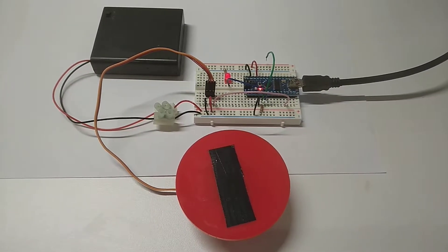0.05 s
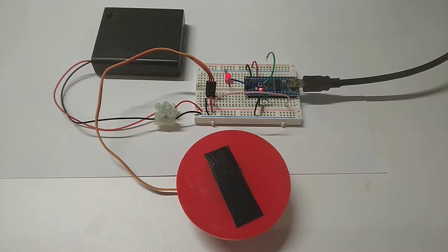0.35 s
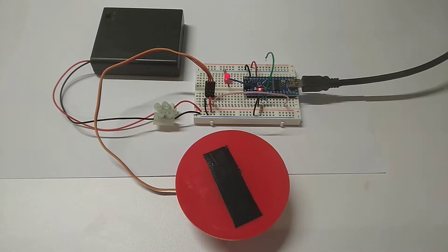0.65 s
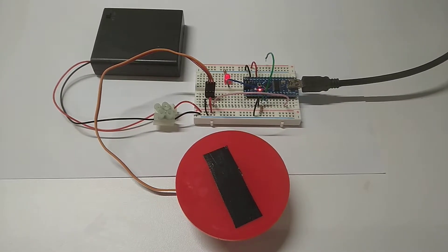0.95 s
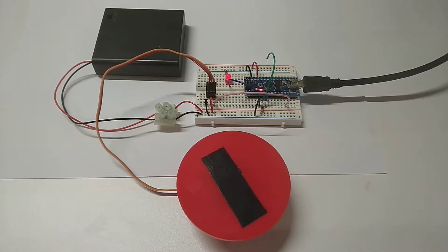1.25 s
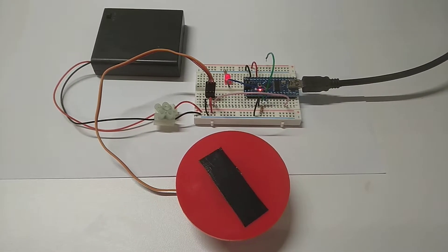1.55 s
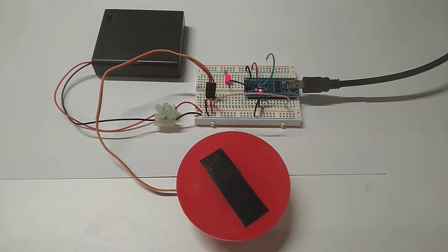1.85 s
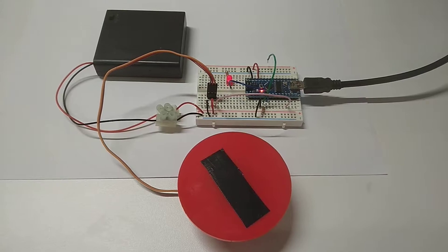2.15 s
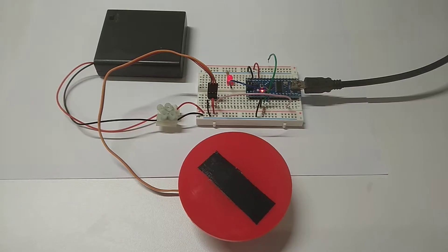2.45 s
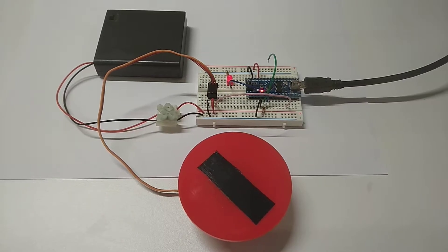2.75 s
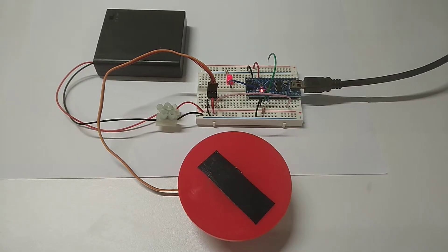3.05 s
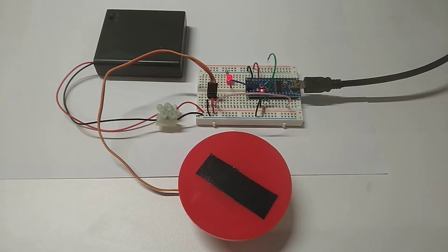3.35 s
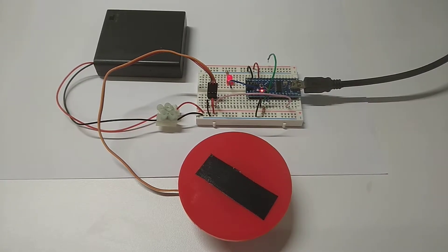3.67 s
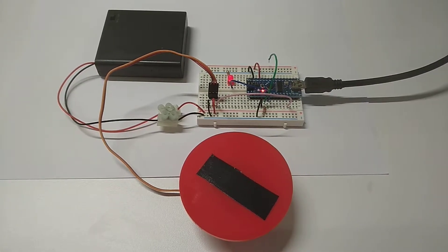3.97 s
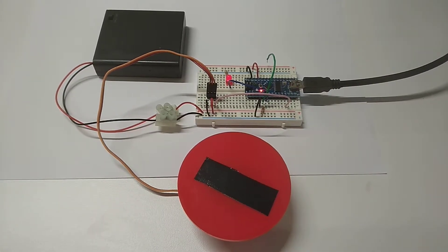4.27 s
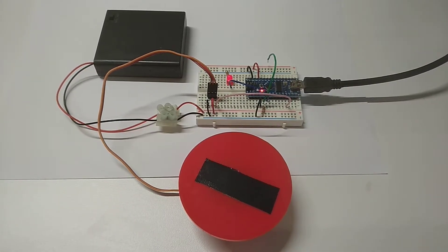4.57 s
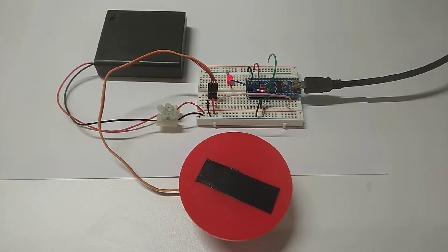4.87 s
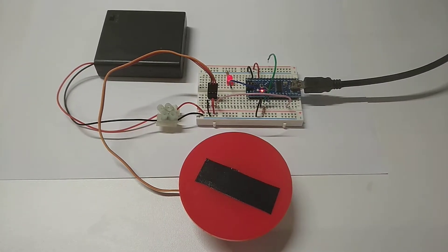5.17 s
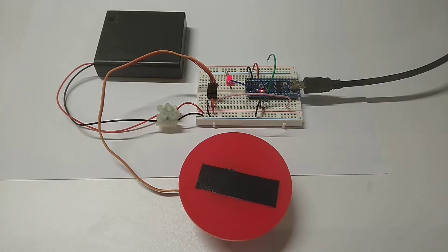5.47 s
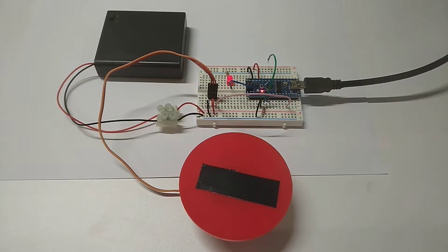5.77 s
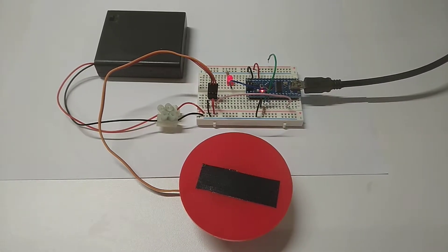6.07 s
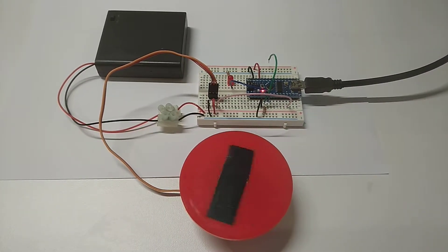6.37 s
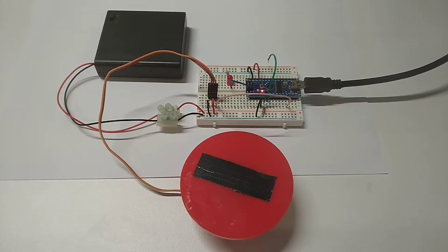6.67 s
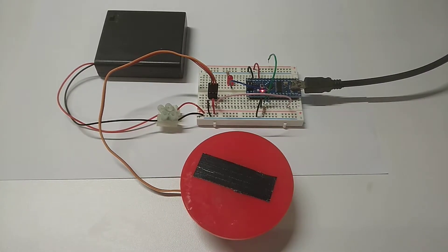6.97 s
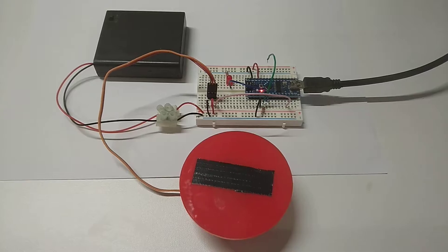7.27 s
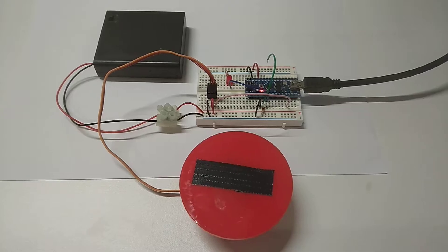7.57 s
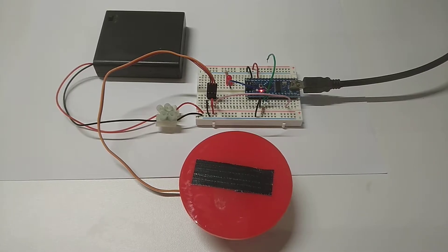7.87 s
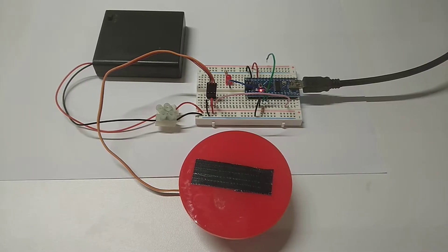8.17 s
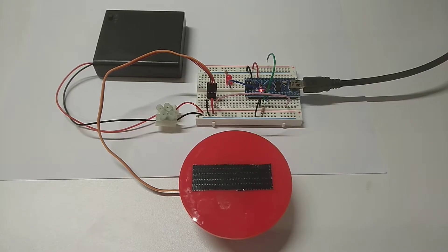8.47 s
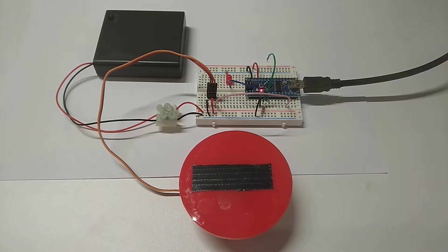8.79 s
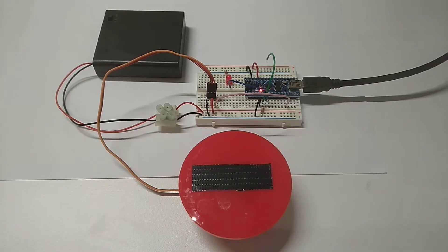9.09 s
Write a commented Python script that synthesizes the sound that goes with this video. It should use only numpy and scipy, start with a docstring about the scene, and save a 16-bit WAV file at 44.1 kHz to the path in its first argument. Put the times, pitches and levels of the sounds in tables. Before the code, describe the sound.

A small hobby servo nudges a plastic disc on a workbench, one short step every second. Each step is a brief, bright rasp of gears in a thin case, some with tiny ticks. The seventh move is a longer sweep with a high motor whine, and three more short steps follow. The sound is close and in stereo, over faint room rumble and microphone hiss.

```python
"""A small hobby servo turns a plastic disc on a workbench, close and in stereo, in a quiet room.
From 0.3 s it takes one short step a second: the motor kicks off, brakes, then rocks or creeps into place.
Its gear teeth rattle in the thin case, the disc hums along and the slack in the gears ticks.
At 6.25 s the seventh move is one long sweep: a third of a second of rasp and rotor whine.
Three more short steps follow. Room rumble and microphone hiss lie under it all."""
import sys
import numpy as np
from scipy import signal
from scipy.fft import rfft, irfft, next_fast_len
from scipy.io import wavfile
from scipy.ndimage import uniform_filter1d

SR = 44100
rng = np.random.default_rng(int(sys.argv[2]) if len(sys.argv) > 2 else 0)


def wrap_up_sound(samples):
    """Save the sound to the file named by the first command line argument, as 16-bit audio."""
    columns = np.atleast_2d(samples).T
    # keep every value between -1 and 1, then stretch to whole-number steps
    tamed = np.clip(columns, -1, 1)
    steps = np.round(tamed * 32767).astype(np.int16)
    wavfile.write(sys.argv[1], SR, steps)


N = 411453
TIME = np.arange(N) / SR
HZ = np.fft.rfftfreq(N, 1 / SR)


def step_rattle(top_mesh_hz=1350, top_db=-22, low_hz=3800, high_hz=11000, high_db=-2, slow_dull_db=13.5):
    """Gear force of the steps: the faster the motor, the denser, louder and brighter the knocks."""
    level, bright_db = motor_effort()
    speed = np.clip(np.sqrt(level / amp(top_db)), 0.1, 1)
    force = level * gear_teeth(top_mesh_hz * speed, spread_db=0.5, knock_db=-5.5,
                               rebound_db=-1.5, rub_s=0.0016)
    low = tint(force, 1 / (1 + (HZ / low_hz) ** 6))
    high = tint(force, 1 - 1 / (1 + (HZ / high_hz) ** 10))
    low_gain = amp(-0.33 * bright_db)
    high_gain = amp(high_db + bright_db - slow_dull_db * (0.5 - speed))
    return force + low * (low_gain - 1) + high * (high_gain - 1)


# Each row: top of the kick in seconds, kick level in dB, kick length factor, travel to the brake in
# seconds, brake level in dB, brake length factor, loss per rebound in dB, brightness in dB,
# disc hum at the kick in dB, disc hum at the brake in dB. Levels are relative.
STEPS = [(0.28, -25, 0.91, .057, -24, 1.1, 12.5, 1.5, -64, -52),
         (1.285, -22.5, 1.03, 0.053, -25, 1.3, 20, 3, -52.5, -53),
         (2.283, -24.5, 1.16, 0.038, -40, 1.3, 19, 2.5, -62, -53),
         (3.257, -23.5, 1.19, 0.053, -37, 0.83, 31.5, 0, -55, -60),
         (4.281, -26.5, 1.3, .044, -28.5, 1, 29.5, 4.5, -69, -56.5),
         (5.253, -25.5, .85, 0.046, -22, 1.01, 32, 0.5, -57, -55.5),
         (6.246, -20.5, 0.81, .328, -24, 0.99, 29.5, 1, -68.5, -55.5),
         (7.256, -22.5, .95, 0.042, -24.5, 0.85, 16.5, -1, -64, -52.5),
         (8.247, -26.5, 0.73, .037, -21.5, 0.72, 8, -3, -62.5, -61),
         (9.244, -24.5, 0.99, 0.04, -24.5, 1.18, 13, -4, -69, -56)]


def surges(rebound_s=0.041, rebound_length=1.2, dull_db_per_s=44, dull_share=0.28, hum_share=0.39):
    """Kick, brake, two rebounds per step. Yields top in s, dB, length factor, brightness dB, hum dB."""
    for (kick_s, kick_db, kick_length, travel_s, brake_db, brake_length,
         loss_db, bright_db, kick_hum_db, brake_hum_db) in STEPS:
        brake_s = kick_s + travel_s
        yield kick_s, kick_db, kick_length, bright_db, kick_hum_db
        # longer travel, duller brake
        yield brake_s, brake_db, brake_length, bright_db - dull_db_per_s * travel_s, brake_hum_db
        for k in (1, 2):
            lost_db = k * loss_db
            yield (brake_s + k * rebound_s, brake_db - lost_db, rebound_length,
                   bright_db - dull_share * lost_db, brake_hum_db - hum_share * lost_db)


# Each row: first nudge in seconds, length in seconds, nudge interval in seconds, relative level in dB.
CREEPS = [(2.344, .066, .028, -41.5), (2.447, .012, .028, -56.5), (3.300, .034, .016, -40),
          (3.387, .045, .034, -41), (4.244, .012, .028, -51), (8.409, 0.093, 0.034, -65)]


def creep_level(nudge_db=3.5):
    """The motor inches along in small nudges."""
    level = np.zeros(N)
    for start_s, length_s, interval_s, db in CREEPS:
        nudges = np.cos(2 * np.pi * (TIME - start_s) / interval_s)
        level += amp(db + nudge_db * nudges) * hold(start_s, start_s + length_s, 0.025, 0.018)
    return level


def motor_effort(rise_s=0.019, fall_s=0.017, creep_bright_db=-4.5):
    """Surges and creeping add in power; returns the motor's level and its brightness in dB."""
    power = creep_level() ** 2
    brightness = creep_bright_db * power
    power += 1e-14
    for top_s, db, length, bright_db, _ in surges():
        span, gain = swell(top_s, rise_s * length, fall_s * length, shape=1.2)
        breakaway_s = top_s - 1.2 * rise_s * length  # the gears stick, then break loose
        gain *= amp(db) * np.clip((TIME[span] - breakaway_s) / 0.002, 0, 1)
        power[span] += gain ** 2
        brightness[span] += bright_db * gain ** 2
    return np.sqrt(power), brightness / power


def gear_teeth(mesh_hz, spread_db, knock_db, rebound_db, rub_s, rebounds_per_s=2500):
    """Each tooth knocks, then rebounds and rubs briefly: separate ticks when slow, a rasp when fast."""
    cycles = np.cumsum(mesh_hz) / SR
    tooth = cycles.astype(int)
    strength, bounce, rub = rng.standard_normal((3, N))
    flank = rng.choice([-1, 1], N)
    knocks = np.diff(tooth, prepend=0) * np.sqrt(SR / mesh_hz) * flank
    rebounds = unit(bounce * (rng.random(N) < rebounds_per_s / SR))
    rub_share = rub_s * mesh_hz
    contact_rms = np.sqrt(rub_share / 2 * (1 - np.exp(-2 / rub_share)))
    contact = np.exp(-(cycles % 1) / rub_share) / contact_rms
    force = amp(spread_db * np.clip(strength[tooth], -2, 2))
    return unit(force * (amp(knock_db) * knocks + contact * (rub + amp(rebound_db) * rebounds)))


# Each row: time in seconds, relative level in dB, motor shaft rate in Hz.
SWEEP = [(6.25, -29.5, 346.2), (6.274, -28.5, 390.6), (6.324, -29.5, 436), (6.412, -29.5, 446.5),
         (6.542, -27.5, 440), (6.58, -39, 408.6)]


def sweep(gain_db=3, flutter=0.008):
    """The motor runs up to full speed; returns the gear rattle and the stereo rotor whine."""
    times_s, _, rates_hz = np.transpose(SWEEP)
    level = amp(gain_db) * sweep_level()
    shaft_hz = np.interp(TIME, times_s, rates_hz) * (1 + flutter * wander(300))
    angle = 2 * np.pi * np.cumsum(shaft_hz) / SR
    rattle = sweep_rattle(shaft_hz, angle)
    whine = rotor_whine(angle, active=abs(TIME - times_s.mean()) < 0.5)
    whine *= (shaft_hz / rates_hz.max()) ** 3  # strongest at full speed
    return level * rattle, level * whine


def sweep_level(rise_s=0.0038, fall_s=0.006):
    """Gain of the sweep, with a quick start and stop."""
    times_s, db, _ = np.transpose(SWEEP)
    return amp(np.interp(TIME, times_s, db)) * hold(times_s[0], times_s[-1], rise_s, fall_s)


# Each row: frequency in Hz, gain on the sweep's rattle in dB.
SWEEP_COLOUR = [(400, 7.5), (1300, 0.5), (2100, 3), (2800, -5.5), (4000, -7.5), (5300, -4.5), (6300, 2.5),
                (7800, -2), (11800, 2), (13300, 0), (14200, 6.5)]


def sweep_rattle(shaft_hz, angle, knocks_per_turn=3, throb=0.5):
    """The teeth rasp at speed; the pinion presses harder once a turn."""
    force = gear_teeth(knocks_per_turn * shaft_hz, spread_db=2.5, knock_db=-5,
                       rebound_db=-5, rub_s=0.0015)
    return tint(force, amp(curve(SWEEP_COLOUR, HZ))) * (1 + throb * np.cos(angle))


# Each row: multiple of the shaft rate, level against the rattle in dB.
ROTOR_TONES = [(1, -31.5), (3, -40), (8, -34), (9, -29.5), (10, -29), (11, -30), (15, -20.5), (17, -23),
               (19, -29), (21, -12), (23, -28), (27, -29)]


def rotor_whine(angle, active, waver_db=3, pan_db=2):
    """Harmonics of the turning rotor, each wavering on its own, left of centre."""
    whine = np.zeros(N)
    for multiple, db in ROTOR_TONES:
        waver = wander(900, count=2 * SR)[:active.sum()]
        whine[active] += amp(db + waver_db * waver) * np.sin(multiple * angle[active])
    return whine * amp([[pan_db], [-pan_db]])


# Each row: start in seconds, relative level in dB.
SLACK_TICKS = [(0.2583, -23.5), (0.3184, -21), (0.3804, -39), (1.3758, -32), (1.4163, -34), (2.3246, -22),
               (3.2586, -20), (3.2988, -19), (5.3264, -33), (6.3072, -20), (6.5334, -12), (6.602, -26),
               (6.6273, -33), (7.3265, -27), (8.4106, -47), (8.442, -46.5)]


def slack_ticks(gain_db=8, chatter=0.26, chatter_s=0.00045):
    """Gear slack snaps shut: one hard knock and a millisecond of chatter."""
    out, t = np.zeros(N), np.arange(256) / SR
    for start_s, db in settling_ticks() + list(SLACK_TICKS):
        snap = chatter * rng.standard_normal(len(t)) * np.exp(-t / chatter_s)
        snap[0] += 1
        part = out[round(start_s * SR):][:len(t)]
        part += amp(db + gain_db) * snap[:len(part)]
    return out


def settling_ticks(settle_s=0.098, top_db=-40, fade_db=16, count=5):
    """After each brake the gears settle in ever fainter random ticks; rows as in SLACK_TICKS."""
    brakes_s = np.array([[kick_s + travel_s] for kick_s, _, _, travel_s, *_ in STEPS])
    lateness = rng.random((len(STEPS), count))
    starts_s = brakes_s + settle_s * lateness
    levels_db = top_db - fade_db * lateness
    return list(zip(starts_s.ravel(), levels_db.ravel()))


def case(force, places=6, places_per_s=7, stray_share=0.22, block=24):
    """Contacts strike the case at places that shift with the gears, each with its own mix of modes."""
    strays = np.repeat(rng.random(N // block + 1) < stray_share, block)[:N]
    place = ((places_per_s * TIME).astype(int) + strays) % places
    return sum(convolve(force * (place == k), case_response()) for k in range(places))


# Each row: frequency in Hz, relative radiation to the left in dB, to the right in dB.
CASE_RADIATION = [(202.5, -46, -41), (770, -31, -31), (1244, -34, -31), (2150, -26, -31.5),
                  (2616, -10.5, -8.5), (2960, -13, -16), (4000, -24, -15.5), (5440, -6, -10),
                  (5960, -10.5, -24.5), (7060, 1, 2), (10270, 2.5, -8), (11200, -6, -4.5),
                  (13400, -10, -20), (15200, -15, -8.5)]


def case_response(ring_db=8, ring_t60_s=0.01, size=2048):
    """A blow on the case: a sharp front, then many short modes, mixed differently on each side."""
    t, hz = np.arange(size) / SR, np.fft.rfftfreq(size, 1 / SR)
    blow = rng.standard_normal((2, size)) * amp(-60 * t / ring_t60_s)
    blow *= amp(ring_db) / np.linalg.norm(blow, axis=1, keepdims=True)
    blow[:, 0] += 1
    spectrum = rfft(blow)
    smoothed = np.sqrt(uniform_filter1d(abs(spectrum) ** 2, size=21, axis=1))
    colour = amp([curve(np.array(CASE_RADIATION)[:, [0, side]], hz) for side in (1, 2)])
    log_gain = np.log(colour / smoothed)
    mirrored = np.hstack([log_gain, log_gain[:, -2:0:-1]])
    minimum_phase = np.exp(np.conj(signal.hilbert(mirrored)))[:, :len(hz)]  # keeps the front sharp
    response = irfft(spectrum * minimum_phase)
    return response / np.sqrt(np.sum(response ** 2) / 2)


# Each row: frequency in Hz, width in Hz, relative level in dB.
DISC_MODES = [(268.6, 61, -2), (361.5, 53, 3.5), (378, 59, -2.5), (507, 67, -9.5)]


def disc_hum(lag_s=0.0097, rise_s=0.031, fall_s=0.041, sweep_db=-28, gain_db=-1):
    """Jerks of the gear train shake the disc on its shaft; it hums in a few low modes."""
    power = (amp(sweep_db) * sweep_level()) ** 2
    for top_s, *_, hum_db in surges():
        span, gain = swell(top_s + lag_s, rise_s, fall_s, shape=2.5)
        power[span] += (amp(hum_db) * gain) ** 2
    modes = sum(amp(db) / (1 + (2 * (HZ - hz) / width_hz) ** 2) for hz, width_hz, db in DISC_MODES)
    return amp(gain_db) * np.sqrt(power) * unit(tint(rng.standard_normal(N), modes))


# Each row: start in seconds, relative level in dB.
TAPS = [(0.996, -58), (2.326, -46), (8.9933, -52)]


def taps(ring_hz=750, t60_s=0.0095, cutoff_hz=1700):
    """Faint dull taps that die at once."""
    out, t = np.zeros(N), np.arange(1024) / SR
    for start_s, db in TAPS:
        out[round(start_s * SR):][:len(t)] += amp(db - 60 * t / t60_s) * np.cos(2 * np.pi * ring_hz * t)
    return tint(out, 1 / np.sqrt(1 + (HZ / cutoff_hz) ** 4))


def reflections(x, bench_db=-15, bench_t60_s=0.073, room_db=-26, room_t60_s=0.22):
    """Quick reflections from the bench and the things on it, then a faint room tail."""
    t = np.arange(SR // 2) / SR
    response = np.zeros((2, len(t)))
    for db, t60_s in ((bench_db, bench_t60_s), (room_db, room_t60_s)):
        tail = rng.standard_normal(response.shape) * amp(-60 * t / t60_s) * (t > 0.002)
        response += amp(db) * tail / np.linalg.norm(tail[0])
    return convolve(x, response)


# Each row: frequency in Hz, relative noise density in dB.
ROOM_RUMBLE = [(7, -4.5), (14, 6), (27, -8), (42, -6), (66, -8), (88, -17.5), (122, -13.5), (200, -20.5),
               (285, -23.5), (400, -28.5), (700, -33.5), (1000, -36.5), (1600, -70.5)]
MIC_HISS = [(700, -5), (1100, 0.5), (2000, -1), (5000, -3.5), (7000, -2.5), (8700, 0), (11000, -3),
            (15500, -4)]
# Each row: frequency in Hz, left-right correlation.
NOISE_CORRELATION = [(60, 0.88), (130, 0.84), (290, 0.74), (640, 0.16), (1410, -0.099), (3100, 0.0),
                     (6820, 0.058), (15000, -0.033)]
# Each row: frequency in Hz, left minus right in dB.
NOISE_BALANCE = [(60, -0.29), (180, -0.92), (550, -1.0), (1650, -0.4), (4970, -0.58), (15000, 0.0)]


def background(rumble_db=-54.5, hiss_db=-67):
    """Low room rumble, alike on both sides, and the hiss of the microphones."""
    correlation = np.clip(curve(NOISE_CORRELATION, HZ), 0, 1)
    out = np.zeros((2, N))
    for spectrum, db in ((ROOM_RUMBLE, rumble_db), (MIC_HISS, hiss_db)):
        colour = amp(curve(spectrum, HZ))
        shared = tint(rng.standard_normal(N), colour * np.sqrt(correlation))
        separate = tint(rng.standard_normal((2, N)), colour * np.sqrt(1 - correlation))
        out += amp(db) * unit(shared + separate)
    left_gain = amp(curve(NOISE_BALANCE, HZ) / 2)
    return np.array([tint(out[0], left_gain), tint(out[1], 1 / left_gain)])


def amp(db):
    """Decibels to gain."""
    return 10 ** (np.asarray(db) / 20)


def unit(x):
    """Scales to rms 1."""
    return x / np.sqrt(np.mean(x ** 2) + 1e-20)


def curve(points, hz):
    """Interpolates (Hz, value) rows on a log-frequency axis."""
    points_hz, values = np.transpose(points)
    return np.interp(np.log(hz + 1), np.log(points_hz + 1), values)


def tint(x, gain):
    """Filters x by a gain given on the grid HZ."""
    size = next_fast_len(N + 4096)
    padded_gain = np.interp(np.fft.rfftfreq(size, 1 / SR), HZ, gain)
    return irfft(rfft(x, size) * padded_gain, size)[..., :N]


def convolve(x, response):
    """Plays x through a left and a right response."""
    return signal.oaconvolve(np.atleast_2d(x), response, axes=1)[:, :N]


def wander(smooth_samples, count=N):
    """Slow random drift of rms 1."""
    return unit(uniform_filter1d(rng.standard_normal(count), smooth_samples))


def swell(top_s, rise_s, fall_s, shape):
    """Slice and gain of one surge, 20 dB down rise_s before and fall_s after its top."""
    span = slice(max(int((top_s - 4 * rise_s) * SR), 0), int((top_s + 4 * fall_s) * SR))
    t = TIME[span] - top_s
    return span, amp(-20 * np.maximum(-t / rise_s, t / fall_s) ** shape)


def hold(start_s, end_s, rise_s, fall_s):
    """Gain of 1 from start to end, 20 dB down rise_s before and fall_s after."""
    outside = np.maximum((start_s - TIME) / rise_s, (TIME - end_s) / fall_s)
    return amp(-20 * np.clip(outside, 0, 8))


def scene():
    """Gears sound through the case; rotor, disc and taps sound directly."""
    rasp, whine = sweep()
    servo = case(step_rattle() + rasp + slack_ticks()) + whine + disc_hum() + taps()
    return servo + reflections(servo) + background()


def record(dry, cutoff_hz=15780):
    """A steep low-pass cuts the top treble."""
    lowpass = signal.firwin(511, cutoff_hz, window=("kaiser", 9), fs=SR)
    return signal.oaconvolve(dry, lowpass[None], "same")


dry = scene()
out = record(dry)
wrap_up_sound(out)
```